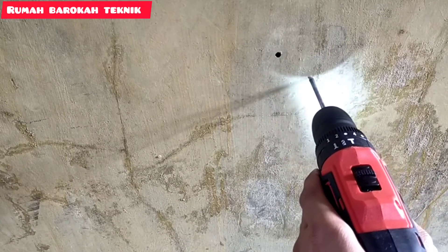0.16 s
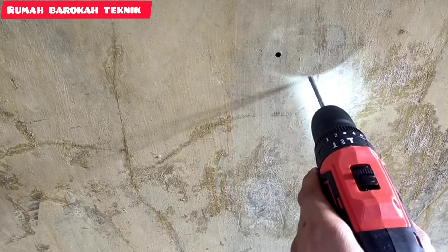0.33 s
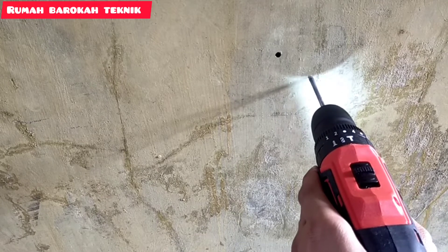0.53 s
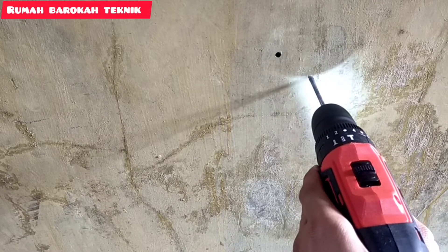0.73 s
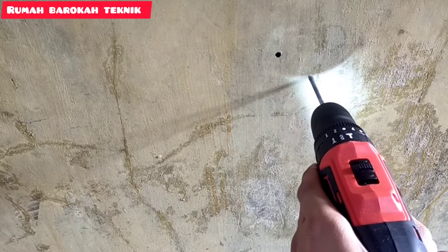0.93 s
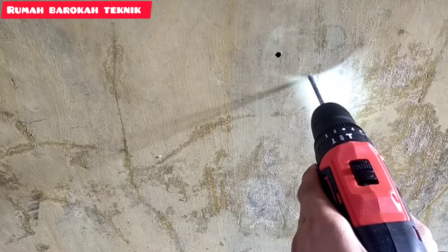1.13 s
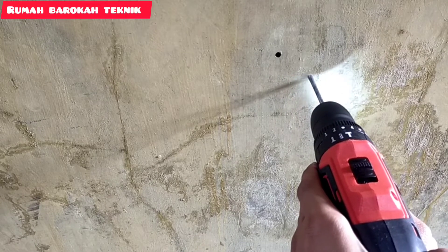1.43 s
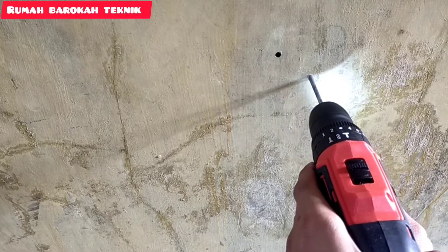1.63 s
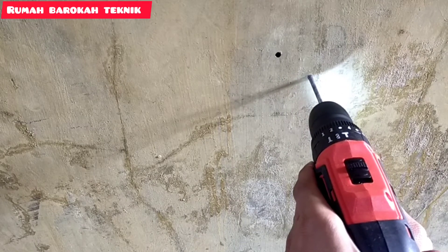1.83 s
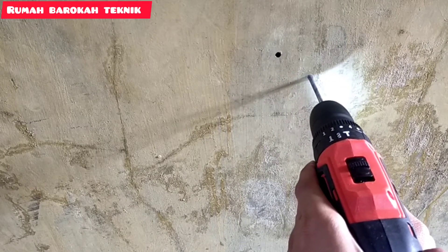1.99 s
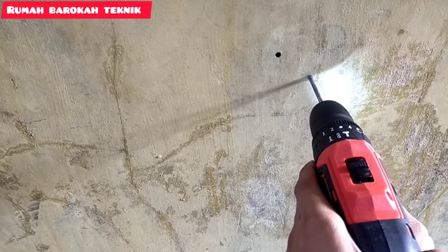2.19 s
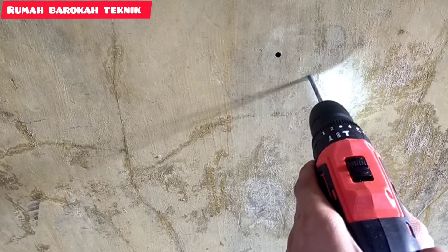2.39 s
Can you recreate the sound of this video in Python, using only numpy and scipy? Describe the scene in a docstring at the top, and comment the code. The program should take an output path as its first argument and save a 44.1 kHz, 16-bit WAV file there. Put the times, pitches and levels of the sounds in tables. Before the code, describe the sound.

A cordless hammer drill bores steadily into a plastered wall, a harsh rattling buzz heard close up

```python
"""A cordless hammer drill bores into a rendered wall, close to a mono phone.
From the start a 15-tooth ratchet strikes about 330 times a second: even blows buzz as a chord, uneven ones and
crushed grit rattle, the wall hums at the blow rate and the steel bit rings hardest once per chuck turn.
The rattle brightens as the bit bites, swells at harder grains, and a narrow chuck ring fades in after 0.6 s.
Under load the motor sags slowly to about 288 blows a second, while the rebound of each blow grows."""
import sys
import numpy as np
from scipy import signal
from scipy.fft import rfft, irfft, next_fast_len
from scipy.io import wavfile
from scipy.ndimage import uniform_filter1d

SR = 44100
rng = np.random.default_rng(int(sys.argv[2]) if len(sys.argv) > 2 else 0)


def dump(signal):
    """Clip the signal to [-1, 1] and save it as 16-bit WAV at the path in sys.argv[1]."""
    limited = np.clip(np.atleast_2d(signal).T, -1, 1)
    pcm = np.round(limited * 32767).astype(np.int16)
    wavfile.write(sys.argv[1], SR, pcm)


N = 112454
TIME = np.arange(N) / SR  # s


def undb(db):
    """Level definition: amplitude ratio of a level in dB."""
    return 10 ** (np.asarray(db) / 20)


def unit(x):
    """Normalisation to an rms of 1."""
    return x / np.sqrt(np.mean(x ** 2))


def curve(col, table):
    """Linear interpolation of one table column over time."""
    table = np.array(table)
    return np.interp(TIME, table[:, 0], table[:, col])


def colour(x, table):
    """Minimum-phase filtering: the cepstrum is folded to make the tabled spectrum causal."""
    hz, db = np.array(table, float).T
    size = 8192
    log_hz = np.log(np.maximum(np.arange(size // 2 + 1) * SR / size, 1))
    outside = np.maximum(np.log(hz[0]) - log_hz, 0) + np.maximum(log_hz - np.log(hz[-1]), 0)
    # beyond the table the gain falls 45 dB per factor e in frequency
    gain_db = np.maximum(np.interp(log_hz, np.log(hz), db) - 45 * outside, -120)
    cepstrum = irfft(np.log(undb(gain_db)))
    cepstrum[1:size // 2] *= 2
    cepstrum[size // 2 + 1:] = 0
    response = irfft(np.exp(rfft(cepstrum)))
    return unit(signal.fftconvolve(x, response)[:N])


def ring(x, hz, width):
    """Resonance: one mode of given frequency and bandwidth in Hz, at unit rms."""
    return unit(signal.lfilter(*signal.iirpeak(hz, hz / width, fs=SR), x))


def walk(rate):
    """Smoothed random fluctuation: noise held at rate Hz, averaged twice, at unit rms."""
    hold = int(SR / rate)
    steps = np.repeat(rng.standard_normal(N // hold + 1), hold)
    return unit(uniform_filter1d(uniform_filter1d(steps, hold), hold)[:N])


def clicks(at, size):
    """Impulse excitation at fractional sample places, shared between two neighbours."""
    at = np.clip(at, 0, N - 2)
    i, part = at.astype(int), at % 1
    return np.bincount(i, size * (1 - part), N) + np.bincount(i + 1, size * part, N)


def gate(phase, late, decay, rest):
    """Periodic exponential decay: one burst per blow over a rest level; times in blow periods."""
    return rest + np.exp(-((phase - late) % 1) / decay)


def split(x, hz):
    """Complementary band splitting into a low part and the remaining high part."""
    low = signal.sosfiltfilt(signal.butter(2, hz, fs=SR, output="sos"), x)
    return low, x - low


def spread(x):
    """Dispersion: the group delay rises in proportion to frequency."""
    delay_ms_per_khz = .6
    size = next_fast_len(N + 4096)
    khz = np.arange(size // 2 + 1) * SR / size / 1000
    return irfft(rfft(x, size) * np.exp(-1j * np.pi * delay_ms_per_khz * khz ** 2), size)[:N]


# motor under load: t/s, blow rate f/Hz, rattle level/dB
SPEED = [(0.0, 330.0, -24.5), (0.15, 328.5, -24.8), (0.3, 324.1, -23.2), (0.45, 321.5, -23.1),
         (0.6, 319.6, -23.9), (0.75, 317.8, -25.1), (0.9, 315.2, -25.2), (1.05, 313.7, -25.3),
         (1.2, 311.0, -24.2), (1.35, 308.1, -23.8), (1.5, 306.6, -23.8), (1.65, 305.1, -23.7),
         (1.8, 298.9, -22.6), (1.95, 293.9, -21.3), (2.1, 291.4, -19.7), (2.25, 288.2, -21.3),
         (2.4, 287.7, -19.8), (2.55, 287.9, -18.7)]
TEETH = 15  # ratchet blows per chuck turn
TURN_START = .3  # part of a chuck turn already done at 0 s


def motor():
    """Phase as the integral of frequency: blows and chuck turns counted by the sagging motor."""
    phase = np.cumsum(curve(1, SPEED)) / SR
    return phase, phase / TEETH + TURN_START


# course of the parts: t/s, then level/dB of wall hum, its octave, its twelfth, casing ring,
# even blows, low grinding, treble grit, bit ring
DRILL = [(0.0, -34, -26.5, -35, -23.5, -17.5, -47, -19.5, -34),
         (0.15, -34, -30, -38, -27, -19, -43, -21, -29),
         (0.3, -38, -33.5, -30.5, -28, -21, -45, -22.5, -29.5),
         (0.45, -38, -35.5, -32.2, -26, -21, -43, -21.5, -29.5),
         (0.6, -42, -33, -29.5, -25, -19.5, -41.5, -21.5, -32),
         (0.75, -42.6, -32, -34, -27, -21, -42.5, -23.5, -33.5),
         (0.9, -37, -31.5, -30.5, -24, -21.5, -43, -22.5, -32.5),
         (1.05, -36.5, -31.5, -33, -35, -22.5, -43, -22.5, -35.5),
         (1.2, -35, -33.5, -29, -26, -21, -39.5, -21.5, -31.5),
         (1.35, -39, -36.5, -38, -38, -20.5, -41, -23, -34),
         (1.5, -33, -37, -38.5, -30, -19.5, -39.7, -22.5, -34),
         (1.65, -32.2, -31.5, -34.3, -29, -20, -39, -23.5, -36),
         (1.8, -29.5, -28.5, -41, -28, -23.5, -37, -22.5, -35.5),
         (1.95, -29.7, -32.0, -31, -27, -21, -35.5, -22, -33.5),
         (2.1, -27.5, -33, -30, -28, -20.5, -35.5, -21.5, -32.5),
         (2.25, -27.5, -28.5, -37, -18, -20.5, -35.1, -22.5, -36),
         (2.4, -28.5, -28, -35.5, -54, -25.5, -37, -23, -34),
         (2.55, -27, -27.5, -35, -44, -25, -36, -21.5, -32)]


def hum(phase):
    """Harmonic series: the wall flexes at the blow rate and its two lowest multiples."""
    total = 0
    for k, depth_db in zip((1, 2, 3), (.6, 1.2, 1.5)):
        level = undb(curve(k, DRILL) + depth_db * walk(25.42))
        total = total + np.sqrt(2) * level * np.sin(2 * np.pi * k * phase + k)
    return total


# spectrum of the low grinding in the wall: f/Hz, level/dB per Hz (relative)
GRIND = [(190, -27), (330, -10), (522, -9), (584, -7.5), (673, -11), (850, -10), (1100, -18), (1870, -120)]


def grinding():
    """Friction noise: a random force shaped by the wall."""
    return undb(curve(6, DRILL)) * colour(rng.standard_normal(N), GRIND)


TOOTH_DB, BLOW_DB = .8, .8  # level scatter from tooth to tooth and from blow to blow


def tooth_blows(phase):
    """Periodic impact: each tooth has its own strength and place, each blow a little chance."""
    count = np.arange(1, int(phase[-1]))
    at = np.interp(count, phase, np.arange(N))  # samples
    period = np.gradient(at)
    tooth_level = TOOTH_DB * rng.standard_normal(TEETH)[count % TEETH]
    size = undb(tooth_level + BLOW_DB * rng.standard_normal(len(count)))
    tooth_shift = 0.0096 * rng.standard_normal(TEETH)[count % TEETH]  # blow periods
    at = at + period * (tooth_shift + .012 * walk(40)[at.astype(int)])
    blows = clicks(at + 0.0038 * period * rng.standard_normal(len(count)), size)
    return at, period, size, blows


CASING_HZ, CASING_WIDTH_HZ = 1289, 70


def casing_ring(blows):
    """Resonance: blows excite one casing mode, filtered narrowly and then broadly."""
    casing = ring(ring(blows, CASING_HZ, CASING_WIDTH_HZ), CASING_HZ, 350)
    return undb(curve(4, DRILL)) * casing


# spectrum of an even blow through bit, casing and wall: f/Hz, level/dB per Hz (relative)
BLOW = [(1150, -35), (1400, 6.5), (1500, 0.5), (1600, 4), (1750, -0.5), (1850, -1.5), (1970, 3), (2140, 2),
        (2250, 0.5), (2450, 2.5), (2600, 0), (2800, -9), (3200, -2.5), (3600, -10), (4600, -21.5)]
REBOUND_LATE = 0.514  # blow periods
REBOUND_DB, REBOUND_DB_PER_S = -16, 2.5  # start relative to the blow, and growth as the hole deepens
CHUCK_HZ, CHUCK_WIDTH_HZ, CHUCK_DB = 2127, 38, -14  # narrow ring, level relative to the even blows


def even_blows(at, period, size, blows):
    """Impulse response: periodic blows and rebounds through a fixed spectrum give a buzzing chord."""
    late = REBOUND_LATE + 0.023 * rng.standard_normal(len(at))
    rebound = clicks(at + period * late, size * undb(REBOUND_DB + REBOUND_DB_PER_S * at / SR))
    even = colour(blows + rebound, BLOW)
    chuck = undb(CHUCK_DB) * ring(even, CHUCK_HZ, CHUCK_WIDTH_HZ)
    chuck_fade = np.clip(TIME - .6, 0, 1)  # enters from 0.6 to 1.6 s
    return undb(curve(5, DRILL)) * spread(even + chuck * chuck_fade)


# spectrum of the rattle: f/Hz, level/dB per Hz (relative)
RATTLE = [(800, -12.5), (1000, -7.5), (1310, 3.5), (1430, -4), (2130, 3), (2700, -6.5), (3140, 1),
          (3700, -9.5), (5000, -17.5)]
RATTLE_DB, RATTLE_JITTER = 2.5, 0.2046  # scatter of loose knocks: level in dB, time in blow periods
CRUSH_DB = 10  # crushing noise relative to the loose knocks
BITE_S, BITE_DB, BITE_HZ = .25, -5, 1800  # duller above BITE_HZ, easing off from 0.5 to 1.5 BITE_S


def rattle(phase, at, period):
    """Aperiodic impact: loose knocks of random sign and time, with modulated crushing noise."""
    late, strength, sign = rng.standard_normal((3, len(at)))
    loose = clicks(at + period * (.6 + RATTLE_JITTER * late), np.sign(sign) * undb(RATTLE_DB * strength))
    crush = gate(phase, 0.041, 1.0, 1.0) * rng.standard_normal(N)
    knocks = spread(colour(unit(loose) + undb(CRUSH_DB) * unit(crush), RATTLE))
    dull, bright = split(knocks, BITE_HZ)
    bite = undb(BITE_DB * np.clip(1.5 - TIME / BITE_S, 0, 1))
    return undb(curve(2, SPEED)) * (dull + bright * bite)


def hammer(phase, turn, swell):
    """Superposition with amplitude modulation: casing, even blows and rattle swing once per turn."""
    at, period, size, blows = tooth_blows(phase)
    wobble = undb(.8 * np.cos(2 * np.pi * (turn - .35)))  # swing of 0.8 dB each way
    ringing = casing_ring(blows) + even_blows(at, period, size, blows)
    return wobble * (ringing + swell * rattle(phase, at, period))


def grains(scatter_db):
    """Granular noise: white noise whose level is redrawn every 16 samples."""
    level_db = scatter_db * rng.standard_normal(N // 16 + 1).repeat(16)[:N]
    return rng.standard_normal(N) * undb(level_db)


# spectrum of the grit: f/Hz, level/dB per Hz (relative)
GRIT = [(3800, -10), (4200, -3.5), (5200, -9), (5600, -4.5), (5900, 0), (6400, -6.5), (6900, -3.5),
        (7450, -0.5), (7900, 0), (8600, 1), (9300, -2.5), (10800, -5), (12000, -4), (14000, -1), (14700, 0),
        (15350, 5), (15600, -1), (16000, -2)]
GRIT_SPLIT_HZ = 9500  # above it the grit comes in sharper bursts


def grit(phase, turn, swell):
    """Modulated noise: crushed render hisses in a burst late in each blow period."""
    soft = colour(grains(0.87) * gate(phase, 0.64, 0.43, 1.2), GRIT)
    sharp = colour(grains(1.8) * gate(phase, .7, .2, .55), GRIT)
    low = split(soft, GRIT_SPLIT_HZ)[0] * undb(.9 * walk(5.05))
    high = split(sharp, GRIT_SPLIT_HZ)[1]
    high = high * undb(.9 * np.cos(2 * np.pi * turn) + 0.46 * walk(23))
    return (low + high) * undb(curve(7, DRILL)) * swell


# modes of the steel bit: f/Hz, bandwidth f/Hz, level/dB (relative)
BIT = [(8590, 140, 4), (8660, 300, -16.5), (8200, 126, 0), (12400, 200, -14)]
RING_WOBBLE = .95  # depth of the amplitude swing with each turn


def bit_ring(phase, turn):
    """Modal synthesis: noise bursts drive the modes of the bit, hardest once per turn."""
    strike = rng.standard_normal(N) * gate(phase, .75, .25, .35)
    strike = strike * (1 + RING_WOBBLE * np.cos(2 * np.pi * turn))
    modes = sum(undb(db) * ring(strike, hz, width) for hz, width, db in BIT)
    return unit(modes) * undb(curve(8, DRILL))


# spectrum of the low rumble of motor and room: f/Hz, level/dB per Hz (relative)
RUMBLE = [(15, -56), (25, -25), (65, -4.5), (91, -15), (130, -7.5), (227, -12.5), (252, -7.5), (260, -15),
          (340, -38), (570, -120)]
RUMBLE_DB = -50  # rms
# faint low motor tones: f/Hz, rms level/dB before a slow wavering
TONES = [(59.2, -64.5), (113.0, -58), (145.3, -60)]


def rumble():
    """Broadband noise with discrete tones: motor and room below the blows."""
    tones = 0
    for hz, db in TONES:
        level = undb(db + 1.0 * walk(3.9))
        tones = tones + np.sqrt(2) * level * np.sin(2 * np.pi * hz * TIME)
    return undb(RUMBLE_DB) * colour(rng.standard_normal(N), RUMBLE) + tones


# reflections off hand, tool and nearby surfaces: delay t/ms, level/dB re direct sound
ECHOES = [(.78, -17), (1.05, -18), (1.3, -19), (2.1, -18), (2.75, -16), (3.1, -18), (5.0, -21), (6.25, -19),
          (6.7, -18), (9.2, -21)]


def echoes(x):
    """Early reflection: delayed, weaker copies join the direct sound."""
    ms, db = np.array(ECHOES).T
    answer = clicks(ms * SR / 1000, undb(db))[:1024]
    return x + signal.fftconvolve(x, answer)[:N]


# the bit catches on harder grains: t/s, swell level/dB
CATCHES = [(.09, 1.5), (.36, 1.6), (1.3, 0.8), (1.87, 3), (2.04, 1.5), (2.28, 0.2), (2.52, 1)]
CATCH_S = 0.032  # from the peak to 1/e of the dB swell


def catches():
    """Gaussian envelope: gain of the brief swells of rattle and grit."""
    return undb(sum(db * np.exp(-((TIME - at) / CATCH_S) ** 2) for at, db in CATCHES))


def scene():
    """Superposition: wall, tool in opposite polarity, and rumble, alike in both channels."""
    phase, turn = motor()
    swell = catches()
    wall = hum(phase) + grinding()
    tool = hammer(phase, turn, swell) + grit(phase, turn, swell) + bit_ring(phase, turn)
    mid = wall - echoes(tool) + rumble()
    return np.array([mid, mid])


TOP_HZ = 15770


def record(dry):
    """Band limiting: the phone cuts the top with a steep elliptic low-pass."""
    return signal.sosfilt(signal.ellip(18, .2, 80, TOP_HZ, fs=SR, output="sos"), dry)


dry = scene()
out = record(dry)
dump(out)
```